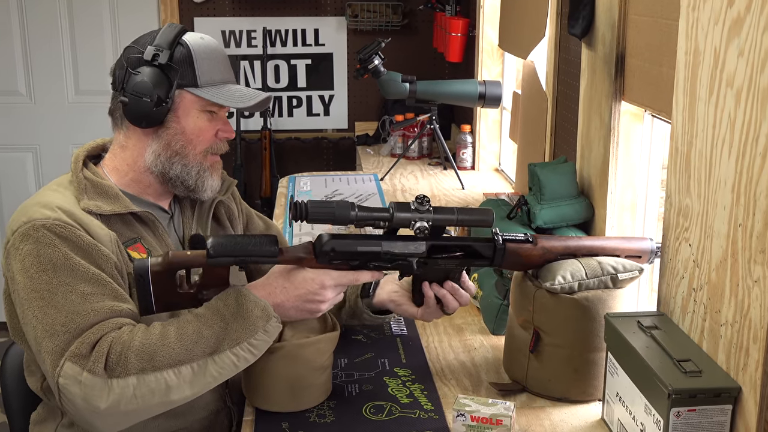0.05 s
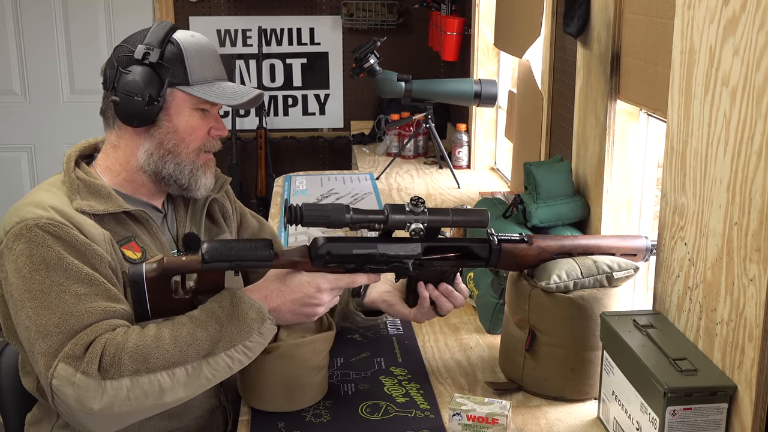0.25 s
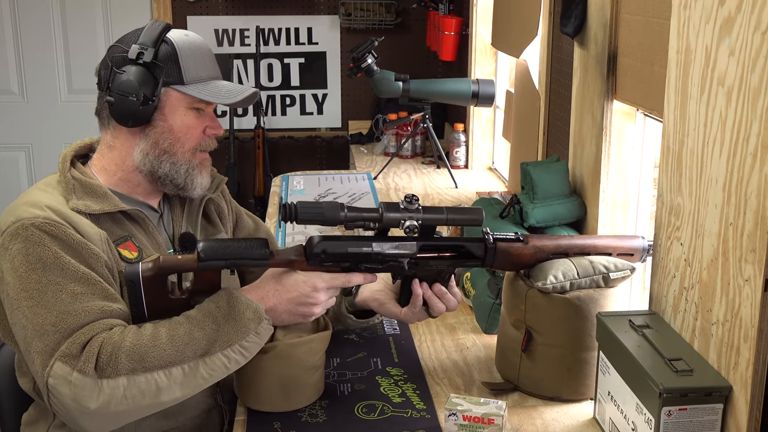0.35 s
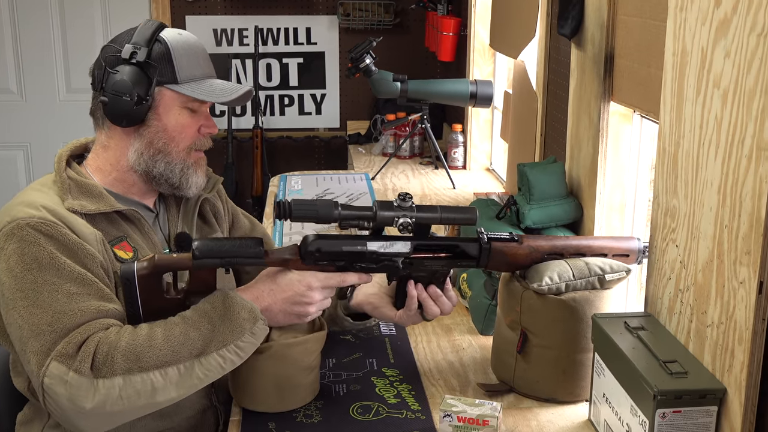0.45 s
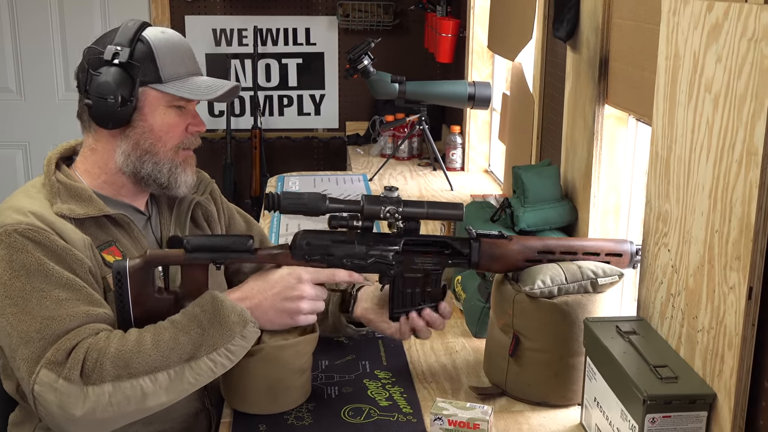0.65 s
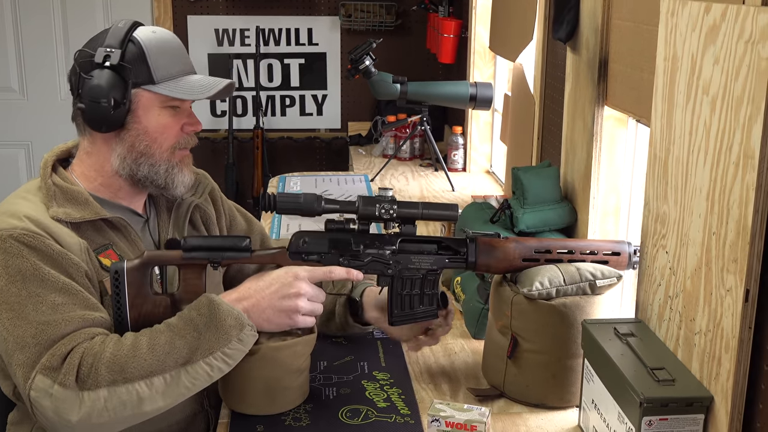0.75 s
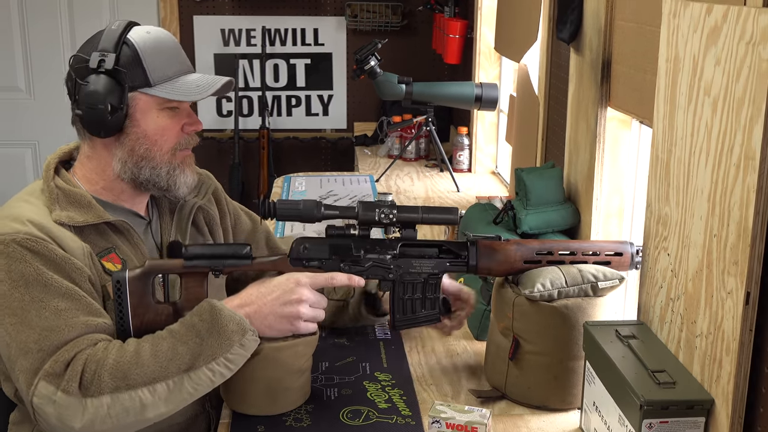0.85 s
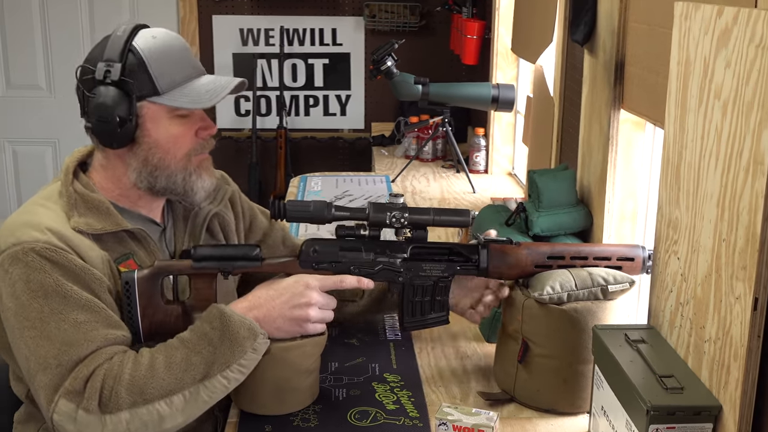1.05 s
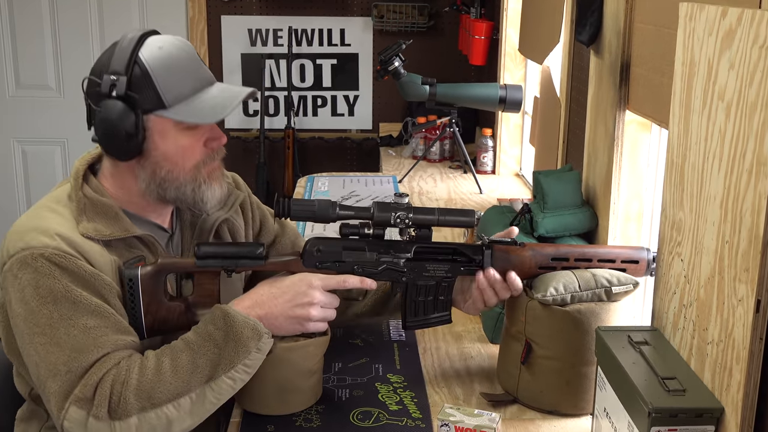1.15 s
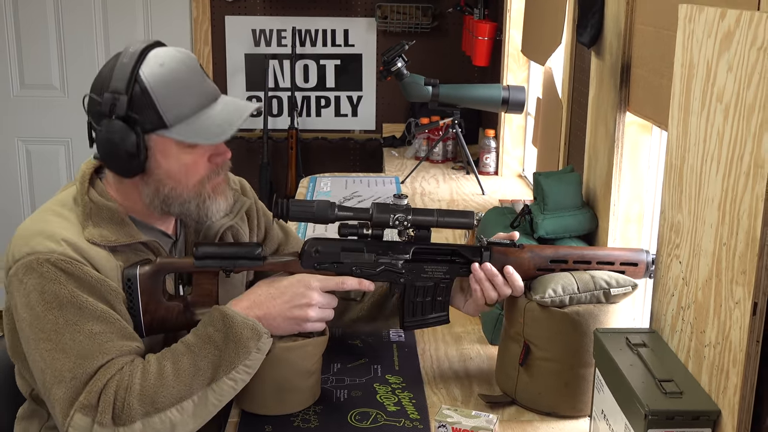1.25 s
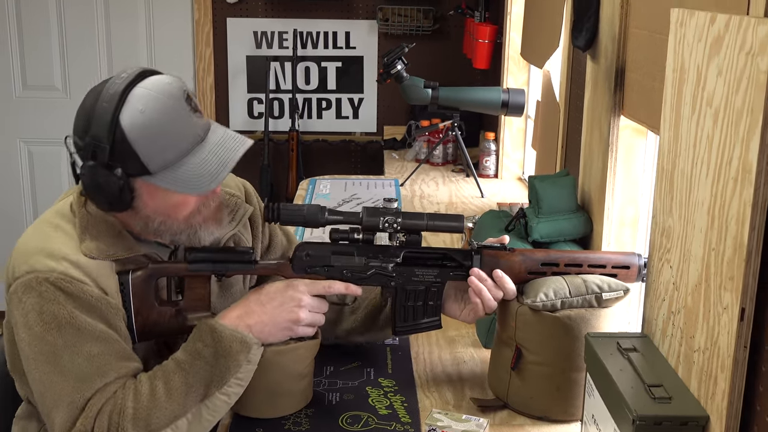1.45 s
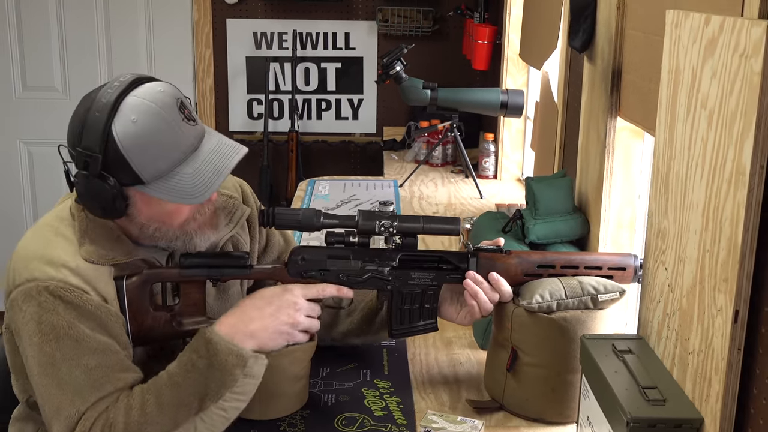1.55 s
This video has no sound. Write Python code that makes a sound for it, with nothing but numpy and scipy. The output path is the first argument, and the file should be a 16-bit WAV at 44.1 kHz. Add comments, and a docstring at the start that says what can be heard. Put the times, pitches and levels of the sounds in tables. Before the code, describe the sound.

A steel magazine is rocked into a rifle in a small wooden room: a light front chatter, then a loud, crisp latch snap with short ring, followed by faint hollow knocks and fleece rustle, close microphone.

```python
"""A faint metal ring dies away; then a steel magazine is rocked into a rifle in a small wooden room.
The front lug chatters, then the latch snaps shut: noise bursts, ringing sines and the room's noisy answer.
Hands on the stock make soft knocks (short sines) and rubs, and a fleece sleeve rustles (coloured noise).
Under it lie still air and a low hum. The recorder's limiter ducks on loud sounds, then recovers."""
import sys
import numpy as np
from scipy import signal
from scipy.fft import rfft, irfft
from scipy.io import wavfile
from scipy.ndimage import uniform_filter1d, minimum_filter1d

SR = 44100
rng = np.random.default_rng(int(sys.argv[2]) if len(sys.argv) > 2 else 0)


def transcribe(u):
    """Save the signal u as a 16-bit wav file named by the first command-line argument.

    u: samples, shape (n,) or (channels, n), limited to [-1, 1]; the rate is SR.
    q: integer samples, one column per channel.
    """
    v = np.clip(np.atleast_2d(u).T, -1, 1)
    q = np.round(v * 32767).astype(np.int16)
    wavfile.write(sys.argv[1], SR, q)


N = 70560  # length in samples (1.6 s)


def undb(db):
    """Turn decibels into a plain multiplier."""
    return 10 ** (np.asarray(db) / 20)


def since(start):
    """Seconds since a moment, zero before it."""
    return np.maximum(np.arange(N) / SR - start, 0)


def fade(start, t60, attack):
    """Quick rise, then a smooth decay that drops 60 dB in t60 seconds."""
    t = since(start)
    rise = 1 - np.exp(-t / attack)
    decay = np.exp(-np.log(1000) * t / t60)
    return rise * decay


def mode(start, hz, t60, attack):
    """One struck resonance: a sine that dies away."""
    return np.sin(2 * np.pi * hz * since(start)) * fade(start, t60, attack)


def ring(start, modes, rise):
    """Steel sings on after a blow: several resonances start together."""
    return sum(undb(db) * mode(start, hz, t60, rise) for hz, db, t60 in modes)


def noise(colour):
    """Noise of standard strength, coloured by (f/Hz, level/dB) points."""
    hz, db = np.array(colour, float).T
    f = np.maximum(np.fft.rfftfreq(N, 1 / SR), 1)
    gain = undb(np.interp(np.log(f), np.log(hz), db))
    gain = gain * np.minimum(f / hz[0], 1) ** 2  # roll off below the first point
    y = irfft(rfft(rng.standard_normal(N)) * gain, N)
    return y / y.std()


def soften(x, hz):
    """A gentler contact loses its treble: a low-pass filter."""
    return signal.sosfilt(signal.butter(2, hz, fs=SR, output="sos"), x)


def grain(rate, depth_db):
    """Random flutter of level, drawn at `rate` points a second with a spread of `depth_db`."""
    points = rng.standard_normal(N)
    return undb(depth_db * np.interp(since(0) * rate, np.arange(N), points))


CRACK_T60_S, CRACK_ATTACK_S = 0.0098, 0.00012


def crack(start, colour):
    """The burst of noise of one metal contact; every burst has the same energy."""
    shape = fade(start, CRACK_T60_S, CRACK_ATTACK_S)
    burst = noise(colour) * shape
    return burst * np.sqrt(np.sum(shape ** 2) / np.sum(burst ** 2))


ROOM_T60_S, ROOM_TREBLE_T60_S, ROOM_BUILD_S = 0.27, 0.19, 0.00081
ROOM_SPLIT_HZ = 6640


def room(start, colour):
    """The small room's answer to a blow: a wash of noise whose treble dies first."""
    wash = noise(colour)
    low = signal.sosfiltfilt(signal.butter(4, ROOM_SPLIT_HZ, fs=SR, output="sos"), wash)
    treble = wash - low
    low_tail = low * fade(start, ROOM_T60_S, ROOM_BUILD_S)
    treble_tail = treble * fade(start, ROOM_TREBLE_T60_S, ROOM_BUILD_S)
    return low_tail + treble_tail


LATCH_S, LATCH_RISE_S = 0.3584, 0.001
LATCH_CRACK_DB, LATCH_STEEL_DB, LATCH_RING_DB, LATCH_ROOM_DB = 3, 8, -34, -18
# contacts as the latch rides over the catch, snaps and bounces:
# t/s, level/dB (relative), f/Hz (low-pass cutoff)
LATCH_CONTACTS = [(0.3457, -29.5, 3840), (0.3538, -21, 2170), (0.355, -21.5, 2600), (0.3582, -2, 14970),
                  (0.3600, -2.5, 15000), (0.3617, -8, 12280), (0.3678, -17.5, 12000)]
# colour of the contact noise: f/Hz, level/dB (relative)
LATCH_CRACK_COLOUR = [(70, -11.5), (300, -4.5), (900, -6.5), (1950, -1.5), (2470, -20.5), (3700, 1.5),
                      (5400, -6), (6800, -14), (12200, -9), (16000, -17.5)]
# resonances of the latch and receiver: f/Hz, level/dB (relative), t60/s
LATCH_RESONANCES = [(135.4, -11, 0.012), (663, -21.5, 0.022), (1352, -16, 0.019), (2033, -13.5, .026),
                    (3055, -14.5, .028), (3330, -4.5, .012), (4080, 0.5, 0.014), (4677, -5.5, 0.016),
                    (5360, -4, 0.0098), (7453, -18, .013), (8540, -19.5, .016), (11620, -8.5, 0.0075)]
# long ring of the magazine shell and spring: f/Hz, level/dB (relative), t60/s
SHELL_RESONANCES = [(2215, -7.5, 0.34), (3000, -3, 0.31), (3180, -1, .34), (4050, 1, .28),
                    (4230, -0.5, 0.34), (4310, -1, .31), (4370, -5.5, .34), (5500, -8, .2),
                    (8300, -14.5, .19)]
# colour of the room's answer: f/Hz, level/dB (relative)
LATCH_ROOM_COLOUR = [(150, -13.5), (450, -23), (640, -11.5), (1100, -14.5), (2140, -6.5), (3160, -1.5),
                     (3500, -5), (4160, 1.5), (6640, -13.5), (10600, -12), (16000, -28)]


def latch():
    """The sprung latch snaps over the catch; receiver and shell ring and the room answers."""
    chatter = sum(undb(db) * soften(crack(s, LATCH_CRACK_COLOUR), hz_top)
                  for s, db, hz_top in LATCH_CONTACTS)
    contacts = undb(LATCH_CRACK_DB) * chatter
    steel = undb(LATCH_STEEL_DB) * ring(LATCH_S, LATCH_RESONANCES, LATCH_RISE_S)
    shell = undb(LATCH_RING_DB) * ring(LATCH_S, SHELL_RESONANCES, LATCH_RISE_S)
    answer = undb(LATCH_ROOM_DB) * room(LATCH_S, LATCH_ROOM_COLOUR)
    return contacts + steel + shell + answer


LUG_S, LUG_RISE_S = 0.2297, 0.0003
LUG_CRACK_DB, LUG_STEEL_DB, LUG_ROOM_DB = -24.5, -21, -42.5
# contacts of the front lug: t/s, level/dB (relative)
LUG_CONTACTS = [(0.2289, 2), (0.2303, 3.5), (0.2328, -3.5)]
# colour of the contact noise: f/Hz, level/dB (relative)
LUG_CRACK_COLOUR = [(150, -16), (400, 2), (1100, -3), (1800, -3.5), (2500, -14.5), (4800, 7), (7800, -30),
                    (13300, -13.5), (16000, -46)]
# resonances of the lug in its recess: f/Hz, level/dB (relative), t60/s
LUG_RESONANCES = [(400, -10, .018), (610, -10, .022), (1352, -17, .025), (1720, -16, .025),
                  (3212, -20, .03), (3960, -3, .014), (4450, -4, .012), (4850, 1, .013), (5260, -1, .011)]
# colour of the room's answer, used by the scuff too: f/Hz, level/dB (relative)
LUG_ROOM_COLOUR = [(150, -0.5), (430, -8.5), (620, 3), (1000, -6.5), (2100, -3), (2800, -12), (4600, -9),
                   (7000, -24), (16000, -34)]


def lug():
    """The front lug chatters into its recess; its close resonances beat against each other."""
    chatter = sum(undb(db) * crack(s, LUG_CRACK_COLOUR) for s, db in LUG_CONTACTS)
    contacts = undb(LUG_CRACK_DB) * chatter
    steel = undb(LUG_STEEL_DB) * ring(LUG_S, LUG_RESONANCES, LUG_RISE_S)
    answer = undb(LUG_ROOM_DB) * room(LUG_S, LUG_ROOM_COLOUR)
    return contacts + steel + answer


SCUFF_T60_S, SCUFF_ROOM_DB = 0.1, -43
# ring that is dying away at the start: f/Hz, level/dB
SCUFF_RESONANCES = [(622, -46), (694, -41), (1421, -47), (3671, -52)]


def scuff():
    """The magazine has just scuffed the rifle; its ring and the room's answer die away."""
    steel = sum(undb(db) * mode(0, hz, SCUFF_T60_S, SOFT_ATTACK_S) for hz, db in SCUFF_RESONANCES)
    return steel + undb(SCUFF_ROOM_DB) * room(0, LUG_ROOM_COLOUR)


SOFT_ATTACK_S = 0.0015


def taps(events, modes):
    """Soft blows on a damped body: each one sounds all its resonances, shifted in pitch."""
    return sum(undb(db + mode_db) * mode(s, hz * ratio, t60, SOFT_ATTACK_S)
               for s, db, ratio in events for hz, mode_db, t60 in modes)


THUD_T60_S, THUD_ATTACK_S = 0.24, 0.0083
TICK_T60_S, TICK_ATTACK_S = 0.01, 0.00016
# hollow knocks of the rifle in the hands: t/s, level/dB (before its resonances), pitch ratio
KNOCK_TIMES = [(.528, -49.5, 0.716), (.5485, -38.5, 1.02), (.616, -42, 1.02), (1.216, -44, 1),
               (1.2355, -36, 0.97)]
# resonances of a knock: f/Hz (before the pitch ratio), level/dB (relative), t60/s
KNOCK_RESONANCES = [(595, 3.5, 0.04), (690, -12, 0.015), (930, 2.5, 0.014)]
# soft bumps of the palm on the stock: t/s, level/dB (before its resonances), pitch ratio
BUMP_TIMES = [(.428, -41.5, 0.74), (.9095, -35, 0.93), (1.134, -43.5, 0.48), (1.366, -37, 0.99)]
# resonances of a bump: f/Hz (before the pitch ratio), level/dB (relative), t60/s
BUMP_RESONANCES = [(176, 4.5, 0.022), (262, 5, 0.025), (365, -5.5, 0.017)]
# the rifle's weight shifts on its rest: t/s, level/dB, f/Hz
WEIGHT_SHIFTS = [(0.002, -43.5, 64.7), (0.25, -41, 74.4), (0.361, -38, 57.4), (0.464, -48.5, 46.6),
                 (0.941, -45, 49.7), (1.103, -41.5, 86), (1.175, -43.5, 68), (1.397, -43.5, 52)]
# tiny ticks of loose metal: t/s, level/dB
METAL_TICKS = [(1.2415, -51.5), (1.3395, -57), (1.399, -52), (1.434, -59)]


def handling():
    """Knocks, bumps and thuds are short sines; ticks are tiny bursts of bright noise."""
    knocks = taps(KNOCK_TIMES, KNOCK_RESONANCES)
    bumps = taps(BUMP_TIMES, BUMP_RESONANCES)
    thuds = sum(undb(db) * mode(s, hz, THUD_T60_S, THUD_ATTACK_S) for s, db, hz in WEIGHT_SHIFTS)
    tick_noise = noise([(2000, -11), (6000, 0), (12000, 7), (16000, -15)])
    tick_level = sum(undb(db) * fade(s, TICK_T60_S, TICK_ATTACK_S) for s, db in METAL_TICKS)
    return knocks + bumps + thuds + tick_noise * tick_level


RUB_ATTACK_S = 0.0049
# hand or magazine rubs along the rifle: t/s, length/s, level/dB, release t60/s
RUB_STROKES = [(0.217, 0.0083, -49, 0.047), (.342, 0.031, -42, .02), (0.88, 0.043, -50.5, 0.055),
               (1.347, 0.015, -52, 0.16), (1.51, 0.082, -63, 0.32)]
# colour of the rubbing: f/Hz, level/dB (relative)
RUB_NOISE_COLOUR = [(200, 2), (650, -9), (1000, -4.5), (2000, -2), (2900, -12.5), (4000, -10),
                    (5500, -12.5), (7500, -24.5), (12000, -26.5), (15000, -39.5)]


def rubs():
    """Skin and magazine slide over wood and steel: short, gritty strokes of noise."""
    push = 0
    for s, length, db, t60 in RUB_STROKES:
        rise = 1 - np.exp(-since(s) / RUB_ATTACK_S)
        release_db = -60 * since(s + length) / t60
        push = push + undb(db + release_db) * rise
    return push * noise(RUB_NOISE_COLOUR) * grain(rate=1000, depth_db=2.5)


# dull rumble of the dragging hands: t/s, level/dB
GRIP_LEVEL = [(0, -71), (.65, -80), (.78, -57), (0.841, -68), (1.04, -71.5), (1.14, -61.5), (1.29, -57),
              (1.45, -64.5), (1.6, -56.5)]
# colour of the rumble: f/Hz, level/dB (relative)
GRIP_NOISE_COLOUR = [(90, -7.5), (330, -2.5), (900, -24.5), (4000, -76)]


def grip():
    """The hands drag on the stock: dull noise that swells and sinks."""
    s, db = np.array(GRIP_LEVEL).T
    return undb(np.interp(since(0), s, db)) * noise(GRIP_NOISE_COLOUR)


FIBRE_DB, FIBRE_RATE = 2, 460  # spread of the flutter in dB, points per second
# sleeve rustle: t/s, body level/dB, treble level/dB (both before the flutter)
SLEEVE_LEVEL = [(0, -67.5, -80.5), (.47, -63, -76), (.53, -56.5, -66.5), (.62, -57, -64), (.71, -55.5, -59),
                (0.792, -56, -65), (.86, -63, -71), (.91, -60, -79), (.95, -68.5, -87), (1.02, -75.5, -87),
                (1.08, -67, -69), (1.13, -60, -63), (1.21, -58.5, -68), (1.31, -59.5, -73),
                (1.36, -56, -68), (1.448, -59.5, -72.5), (1.55, -50, -60.5), (1.6, -54, -67)]
# colour of its body: f/Hz, level/dB (relative)
SLEEVE_BODY_COLOUR = [(150, -4), (500, 0), (900, -4.5), (1700, -3), (2700, -9), (4000, -5.5), (6000, -10),
                      (7500, -36.5), (16000, -57)]
# colour of its treble: f/Hz, level/dB (relative)
SLEEVE_TREBLE_COLOUR = [(3000, -17.5), (6200, 3.5), (7900, -5), (10300, -0.5), (13000, -3.5),
                        (15000, -16.5), (16000, -18)]


def sleeve():
    """Fleece brushes the bench as the arm moves; its noise flutters as fibres catch and slip."""
    s, body_db, treble_db = np.array(SLEEVE_LEVEL).T
    t = since(0)
    body = undb(np.interp(t, s, body_db)) * noise(SLEEVE_BODY_COLOUR)
    treble = undb(np.interp(t, s, treble_db)) * noise(SLEEVE_TREBLE_COLOUR)
    return (body + treble) * grain(FIBRE_RATE, FIBRE_DB)


AIR_DB, HUM_HZ, HUM_DB = -63, 91.4, -63
# colour of the room's still air: f/Hz, level/dB (relative)
AIR_COLOUR = [(15, -33), (25, -5), (108, -0.5), (354, -18.5), (545, -13.5), (796, -22.5), (2990, -28.5),
              (3920, -35.5), (16000, -40.5)]


def air():
    """Quiet room: steady soft noise and a low hum that wavers in level."""
    still_air = undb(AIR_DB) * noise(AIR_COLOUR)
    hum = undb(HUM_DB) * np.sin(2 * np.pi * HUM_HZ * since(0))
    return still_air + hum * grain(rate=4, depth_db=4.5)


def scene():
    """Everything adds up at one microphone."""
    main = latch() + lug() + scuff()
    hands = handling() + rubs() + grip()
    return (main + hands + sleeve() + air())[None]


LOW_CUT_HZ, TOP_HZ = 30, 15900
LIMIT_DB, CEILING_DB = -12.5, -2
LOOKAHEAD_S, HOLD_S, RELEASE_DB_PER_S = 0.0054, 0.029, 256.5


def record(dry):
    """Cut deep bass; a look-ahead limiter ducks, holds and recovers; round peaks and cut the top."""
    x = signal.sosfilt(signal.butter(2, LOW_CUT_HZ, "high", fs=SR, output="sos"), dry[0])
    size, hold = int(LOOKAHEAD_S * SR), int(HOLD_S * SR)
    power = np.abs(uniform_filter1d(x ** 2, size))
    over_db = np.maximum(10 * np.log10(power + 1e-18) - LIMIT_DB, 0)
    # keep the largest excess of the last moments
    held_db = -minimum_filter1d(-over_db, hold, origin=(hold - 1) // 2)
    # the cut may jump up at once but sinks only at the release speed
    recovery = RELEASE_DB_PER_S * since(0)
    cut_db = np.maximum.accumulate(held_db + recovery) - recovery
    # duck slightly early, and smoothly
    gain = undb(uniform_filter1d(minimum_filter1d(-cut_db, size), size))
    ceiling = undb(CEILING_DB)
    rounded = ceiling * np.tanh(x * gain / ceiling)
    return signal.sosfilt(signal.ellip(10, .2, 80, TOP_HZ, fs=SR, output="sos"), rounded)[None]


dry = scene()
out = record(dry)
transcribe(out)
```